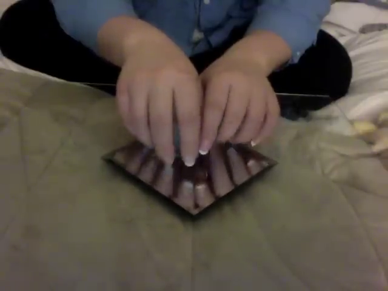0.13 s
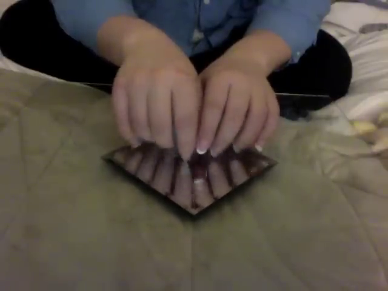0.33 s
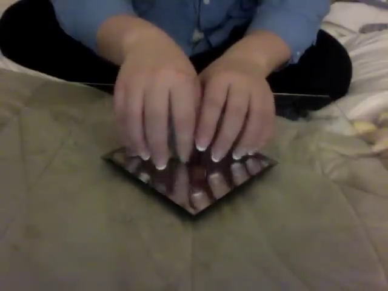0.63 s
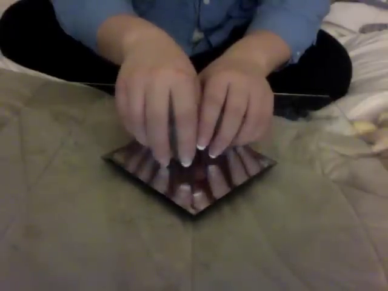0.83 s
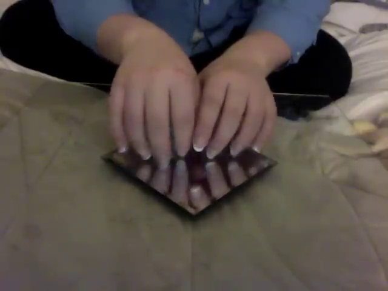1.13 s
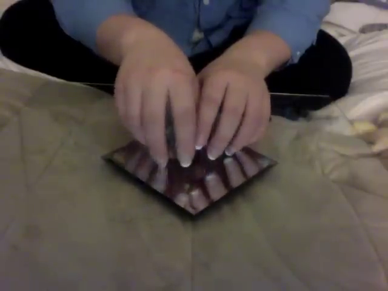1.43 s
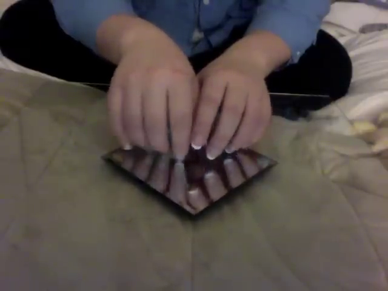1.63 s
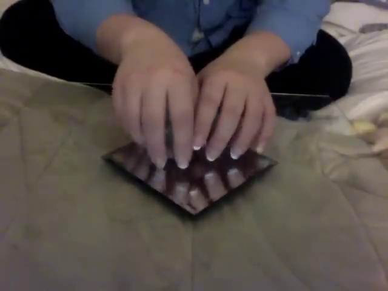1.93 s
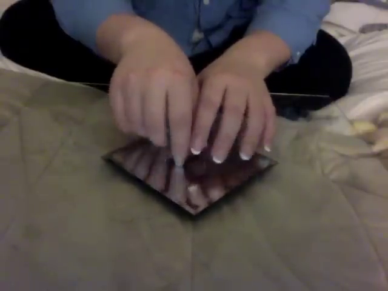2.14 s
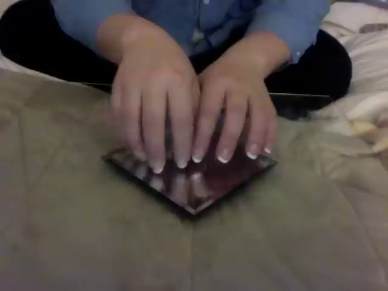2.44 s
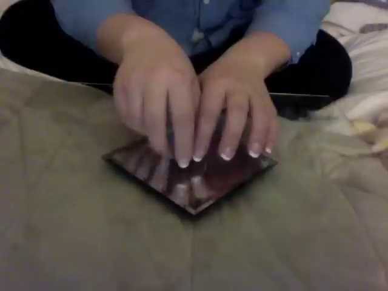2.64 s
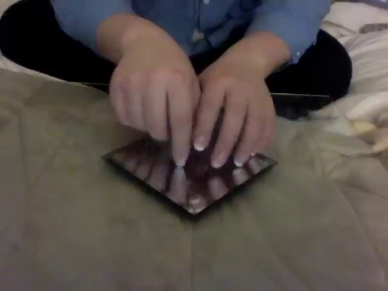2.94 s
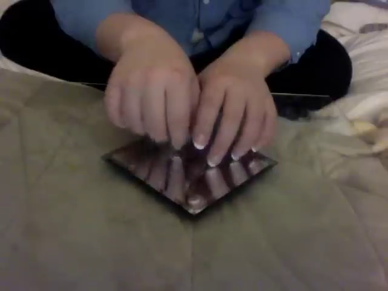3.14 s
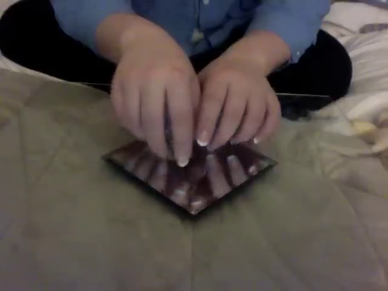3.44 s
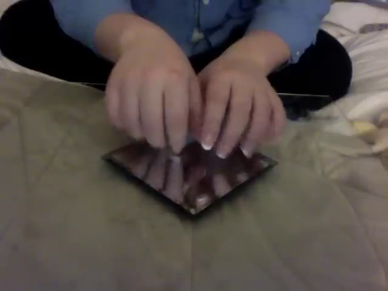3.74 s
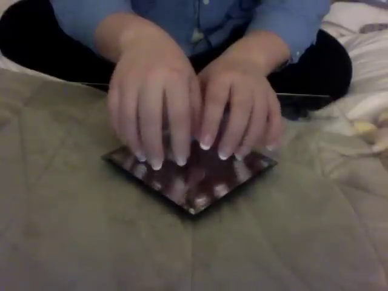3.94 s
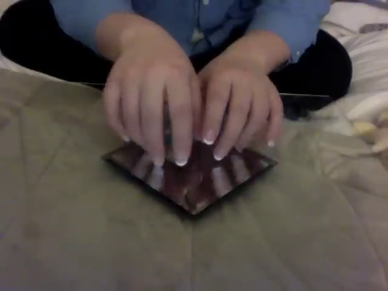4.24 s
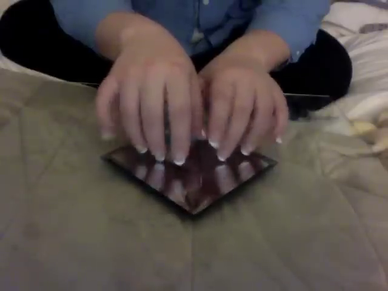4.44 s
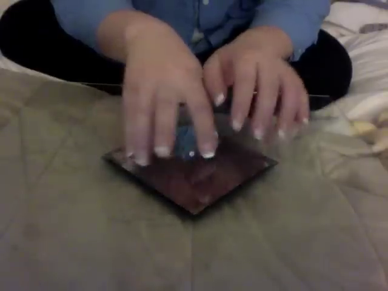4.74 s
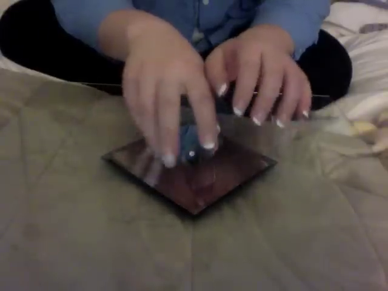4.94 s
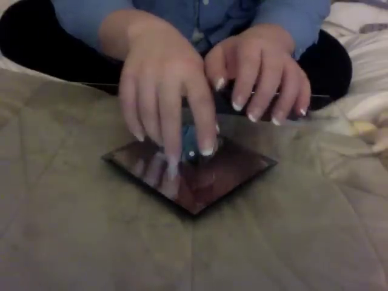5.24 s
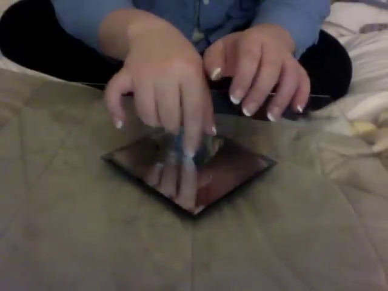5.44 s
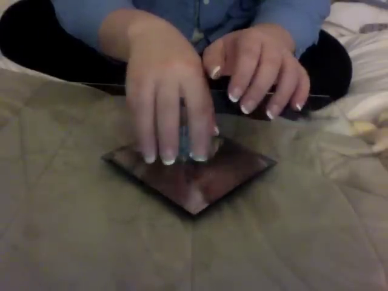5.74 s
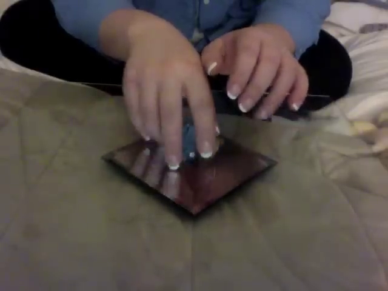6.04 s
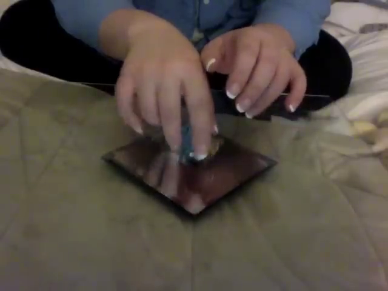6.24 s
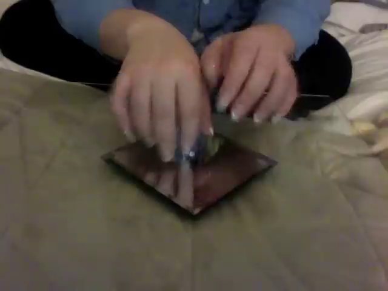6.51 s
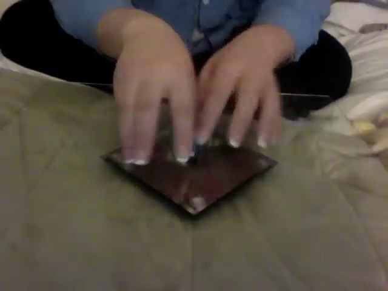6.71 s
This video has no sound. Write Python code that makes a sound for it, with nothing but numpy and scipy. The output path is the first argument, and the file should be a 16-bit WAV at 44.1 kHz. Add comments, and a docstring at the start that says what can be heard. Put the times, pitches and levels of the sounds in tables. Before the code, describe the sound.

Long fingernails tap a small glass mirror lying on soft bedding. Each touch gives a short dull thud with a tiny bright clink and snap. Taps come singly or in tight pairs, irregular in strength, thinning out toward the end with one last tap. A quiet fan hum, thin electronic whine and soft hiss continue throughout. Close microphone in a small, fairly dry room.

```python
"""Fingernails on a small mirror

Long fingernails tap a small glass mirror that lies on a soft bed cover in a quiet room.
Each tap is a low thud and a clink, both made of fading sine waves, plus a short snap of noise.
The touched spot picks which groups of glass tones ring. The room adds an echo and a short tail.
Behind it: wavering fan tones, a thin electronic whine, screen whistles, hiss, a narrow rushing
noise near 3 kHz and a faint tick every two seconds."""
import sys
import numpy as np
from scipy import signal
from scipy.fft import rfft, irfft, next_fast_len
from scipy.io import wavfile

SR = 44100
rng = np.random.default_rng(int(sys.argv[2]) if len(sys.argv) > 2 else 0)


def wrap_up_sound(samples):
    """Save the sound to the file named by the first command line argument, as 16-bit audio."""
    columns = np.atleast_2d(samples).T
    # keep every value between -1 and 1, then stretch to whole-number steps
    tamed = np.clip(columns, -1, 1)
    steps = np.round(tamed * 32767).astype(np.int16)
    wavfile.write(sys.argv[1], SR, steps)


N = 302967  # length of the scene in samples

# Nail taps. Levels are before the room; spot and brightness then alter the clink.
# Columns: start_s, thud_db, clink_db, brightness_db_per_octave, spot (0 middle, 0.5 side, 1 corner)
NAIL_TAPS = [(0.0307, -52, -57.5, -8, 0.24), (0.075, -53.5, -62, -15, 0), (0.5679, -47.5, -56, 0.5, 0.46),
             (0.617, -56, -65, -6, 0.26), (0.7712, -40.5, -54, -5, 0.065),
             (1.166, -51.5, -55.5, -0.5, 0.59), (1.223, -57, -62.5, 4, 0.23),
             (1.254, -52, -59.5, -12, 0.16), (1.4201, -46, -57, -12, 0), (1.615, -44, -66, -3, 0),
             (1.921, -49.5, -66, -8, .2), (2.0848, -35.5, -51.5, -1.5, 0.06), (2.315, -51, -63, -10, 0),
             (2.3881, -46.5, -55.5, 4.5, 0.26), (2.474, -39, -58.5, -6, 0.063),
             (2.8167, -45.5, -47, 0, 0.95), (2.8246, -39.5, -49, -5, 0.4), (2.851, -54, -75, 8, 0.027),
             (3.549, -37.5, -52, -2.5, 0.044), (3.822, -41, -50, 0.5, 0.61), (3.8818, -48, -62, -10, 0.59),
             (4.2033, -38, -50.5, -22, 0.38), (5.0363, -37.5, -47.5, 17, 0), (5.38, -54, -57, -16, 0.028),
             (5.76, -64, -58.5, 8, 0.25), (5.8482, -50.5, -52.5, -2.5, 0.23), (6.008, -48, -64, -10, 0.18),
             (6.814, -46.5, -51.5, -8, 0.61)]
# The mirror rocking on its soft backing; levels only relative to each other.
# Columns: pitch_hz, level_db, t60_s (time to fade by 60 dB)
ROCKING_MODES = [(149, -10.5, 0.056), (208, 4, 0.03), (236.7, 6.5, 0.046), (320, 1, 0.053),
                 (365, -6.5, 0.035), (450, -17, 0.018), (565, -31, 0.0091)]
# Tones of the glass plate, one list for each family that rings together; levels relative in a family.
# Columns: pitch_hz, level_db, t60_s
GLASS_FAMILIES = [
    [(1610, -7.5, 0.063), (1850, 1.5, 0.015), (2010, 1, 0.039), (2360, -10.5, 0.078), (3430, -26, 0.017)],
    [(3960, 2, 0.067), (4080, 2, 0.11), (4070, -5, 0.21), (4140, -8.5, 0.094)],
    [(4224, -7, 0.22), (4275, -9.5, 0.17), (4260, -7, 0.068), (4425, -4, .1), (4680, 5, .025)],
    [(4500, -10, 0.19), (5076, 7.5, 0.05), (5240, -3, 0.021), (5480, -5, 0.022)],
    [(6860, 5.5, 0.036), (6510, -9, 0.06), (7090, 9, 0.023)],
    [(7600, -2, .04), (7670, 5, 0.057), (10470, 0, 0.086), (12560, -9, .016), (13650, -15, .018)],
    [(7940, 2.5, 0.14), (9800, -7, .1)],
    [(8400, -5, 0.14), (8450, 13, 0.03), (8400, -18, 0.016)],
]
# How readily each of these families answers a tap, in the same order.
# Columns: middle_db, side_db, corner_db
FAMILY_SHAPES = [(0.5, -7.5, -9), (-1, -0.5, -7), (-1.5, -26, -8), (-30, 7.5, 6.5), (-1.5, -12, 4.5),
                 (-10, -15, -16), (-20, -2.5, -14), (-16.5, 1, -9)]
# Tone colour of the nail's own snap; levels only relative to each other.
# Columns: pitch_hz, level_db_per_hz
SNAP_COLOUR = [(700, -1), (1300, -20), (1800, -12), (3300, 7.5), (5800, 0.5), (8500, 2), (10000, -9),
               (14000, -6), (16000, -18)]
# Fan and motor tones.
# Columns: pitch_hz, rms_level_db, unsteadiness (0-1)
FAN_TONES = [(89.8, -59, 0.23), (133.2, -61.5, 0.26), (263.2, -64.5, 0.63), (398, -65.5, 0.41),
             (666.6, -66.5, 0), (3000, -76.5, 0.3), (3375, -79.5, 0.7), (3986, -75, 0.36)]
# Electronic whine.
# Columns: multiple (of WHINE_HZ), rms_level_db
WHINE_TONES = [(3, -79.5), (4, -79.5), (5, -67.5), (6, -73), (7, -79), (8, -75.5), (9, -70), (10, -77.5),
               (11, -80), (12, -70), (13, -74), (14, -78.5), (15, -77.5), (16, -80), (19, -79.5),
               (20, -75.5), (21, -74), (22, -77), (23, -78), (25, -87)]
# Screen line-scan whistles, which beat against each other.
# Columns: pitch_hz, rms_level_db, unsteadiness (0-1)
SCREEN_WHISTLES = [(15674, -80, .2), (15734.2, -66.5, .3), (15749, -72.5, .3)]
# Room air and microphone hiss, against full scale.
# Columns: pitch_hz, level_db_per_hz
HISS_COLOUR = [(25, -108), (50, -93.5), (75, -82.5), (110, -79.5), (190, -82), (320, -84.5), (500, -87),
               (800, -87), (1250, -95.5), (2200, -97.5), (4300, -99.8), (6500, -102), (9500, -103.7),
               (15000, -105.5)]
# The part of the hiss that differs between left and right, against the shared hiss.
# Columns: pitch_hz, side_level_db
HISS_WIDTH = [(25, -9), (70, -32), (250, -24), (1000, -25.5), (4000, -18.5), (8000, -11.5), (15000, -9)]
# Narrow band of rushing noise near 3 kHz, against full scale.
# Columns: pitch_hz, level_db_per_hz
RUSH_COLOUR = [(2000, -135), (2750, -106), (2900, -95), (3000, -92.5), (3120, -108), (4000, -135)]

TAP_LENGTH = SR // 4  # samples
THUD_SCATTER_DB = 1.5
# above this pitch a hard nail tip rings the glass more, a soft fingertip less
CONTACT_KNEE_HZ = 3910
# a harder contact also knocks higher:
# thud dB per octave for each dB per octave of brightness
THUD_FOLLOWS = 0.34
TICK_START_S, TICK_EVERY_S, TICK_DB = 0.126, 2.0, -52
ROOM_T60_S, ECHO_S, CLINK_ECHO_DB = 0.22, 0.027, -21
WHINE_HZ = 569.07
CUTOFF_HZ = 16000


def mirror():
    """Each tap rocks the mirror (thud), rings the glass (clink) and snaps; the snap grows with the ringing."""
    thuds, clinks = np.zeros(N), np.zeros(N)
    for start_s, thud_db, clink_db, brightness_db, spot in NAIL_TAPS:
        thud = ring(thud_modes(brightness_db), rise_s=0.0021, scatter_db=THUD_SCATTER_DB,
                    phase_spread=0.073)
        # the thud is flipped and comes a fraction of a millisecond after the clink
        add(thuds, -from_db(thud_db) * thud, start_s + 0.00038)

        strengths = from_db(clink_db) * family_gains(spot, brightness_db)
        glass = np.zeros(TAP_LENGTH)
        for strength, modes in zip(strengths, GLASS_FAMILIES):
            glass += strength * ring(modes, rise_s=0.0011, scatter_db=4.0, phase_spread=1.0)
        nail = strengths.mean() * from_db(-1.5) * snap(rise_s=0.00022, t60=0.022)
        add(clinks, glass + nail, start_s)
    # so small a plate radiates hardly any deep bass
    bass_cut = signal.butter(2, 75, "high", fs=SR, output="sos")
    return signal.sosfilt(bass_cut, thuds), clinks


def thud_modes(brightness_db):
    """A hard contact tilts the rocking tones towards the higher ones."""
    lowest_hz = ROCKING_MODES[0][0]
    tilt_db = THUD_FOLLOWS * brightness_db
    return [(hz, db + tilt_db * np.log2(hz / lowest_hz), t60) for hz, db, t60 in ROCKING_MODES]


def family_gains(spot, brightness_db):
    """The touched spot picks the families that ring; the hardness of the contact tilts the high ones."""
    shapes = [np.interp(spot, [0, 0.5, 1], from_db(shape_db)) for shape_db in FAMILY_SHAPES]
    # each family is judged by the pitch of its tone with the highest listed level
    leading_hz = np.array([max(modes, key=lambda mode: mode[1])[0] for modes in GLASS_FAMILIES])
    octaves_above_knee = np.maximum(np.log2(leading_hz / CONTACT_KNEE_HZ), 0)
    return shapes * from_db(brightness_db * octaves_above_knee)


def ring(modes, rise_s, scatter_db, phase_spread):
    """Fading tones that swell over the contact time; each blow weights them a little differently."""
    t = np.arange(TAP_LENGTH) / SR
    hz, db, t60 = np.transpose(modes)[:, :, None]
    strength = from_db(db + scatter_db * rng.standard_normal(hz.shape))
    phase = phase_spread * rng.uniform(-np.pi, np.pi, hz.shape)
    waves = strength * fade_out(t, t60) * np.sin(2 * np.pi * hz * t + phase)
    swell = 1 - np.exp(-(t / rise_s) ** 2)
    return unit_blow(waves.sum(axis=0) * swell)


def snap(rise_s, t60):
    """A few milliseconds of noise as the nail's edge meets the glass."""
    t = np.arange(TAP_LENGTH) / SR
    noise = coloured(rng.standard_normal(TAP_LENGTH), SNAP_COLOUR)
    swell = 1 - np.exp(-t / rise_s)
    return unit_blow(noise * swell * fade_out(t, t60))


def room(x, wet_db, echo_db, side_db, gap_s):
    """One wall echo and short diffuse reflections, almost alike at the two close microphone ports."""
    t = np.arange(TAP_LENGTH) / SR
    # the tail is silent until gap_s, then grows in over another gap_s
    fade = fade_out(t, ROOM_T60_S) * np.clip(t / gap_s - 1, 0, 1)
    tails = rng.standard_normal((2, TAP_LENGTH)) * fade / np.sqrt(np.sum(fade ** 2))
    mid, side = from_db(wet_db) * signal.fftconvolve(x[None], tails, axes=1)[:, :N]
    add(mid, from_db(echo_db) * x, ECHO_S)
    return x + mid + from_db(side_db) * side * [[1], [-1]]


def ticks(hz, t60):
    """A tiny high tick, a quickly fading sine wave, comes back every two seconds."""
    track = np.zeros(N)
    t = np.arange(TAP_LENGTH) / SR
    tick = from_db(TICK_DB) * np.sin(2 * np.pi * hz * t) * fade_out(t, t60)
    for start_s in np.arange(TICK_START_S, N / SR, TICK_EVERY_S):
        add(track, tick, start_s)
    return track


def background():
    """Hum, whistles, whine and rush sit in the middle; the hiss is slightly spread."""
    return fan_hum() + screen_whistle() + electronic_whine() + hiss_and_rush()


def fan_hum():
    """The fan and its motor give several tones, most of them wavering."""
    return sum(tone(hz, db, unsteady) for hz, db, unsteady in FAN_TONES)


def screen_whistle():
    """Very high line-scan tones so close in pitch that they beat."""
    return sum(tone(hz, db, unsteady) for hz, db, unsteady in SCREEN_WHISTLES)


def electronic_whine():
    """Thin tones at whole multiples of one base pitch."""
    return sum(tone(multiple * WHINE_HZ, db, unsteady=0.12) for multiple, db in WHINE_TONES)


def hiss_and_rush():
    """Shaped random noise: a wide hiss with a small left-right difference, and a narrow central rush."""
    white = rng.standard_normal((3, N)) * np.sqrt(SR / 2)  # power of 1 per Hz
    mid = coloured(white[0], HISS_COLOUR) + coloured(white[2], RUSH_COLOUR)
    side = coloured(coloured(white[1], HISS_COLOUR), HISS_WIDTH)
    return mid + side * [[1], [-1]]


def tone(hz, db, unsteady):
    """A sine wave whose level and phase waver by slow random drifts."""
    turn = 2 * np.pi * hz * np.arange(N) / SR
    waver = unsteady * (drift(2.76) * np.sin(turn) + drift(0.47) * np.cos(turn))
    steady = np.sin(turn + rng.uniform(0, 2 * np.pi))
    return from_db(db) * rms_one(steady + waver)


def drift(rate_hz):
    """Slow random wander with a spread of 1: noise smoothed twice, at a fortieth of the sample rate."""
    r = np.exp(-80 * np.pi * rate_hz / SR)
    noise = rng.standard_normal(N // 40 + 2002)
    slow = signal.lfilter([1], [1, -2 * r, r * r], noise)[2000:]  # drop the filter's start-up
    return np.interp(np.arange(N) / 40, np.arange(len(slow)), rms_one(slow))


def coloured(x, spectrum):
    """Shape noise by (pitch_hz, level_db) points joined on a log-frequency axis."""
    hz, db = np.transpose(spectrum)
    size = next_fast_len(len(x))
    bins_hz = np.maximum(np.fft.rfftfreq(size, 1 / SR), 1)
    gains = from_db(np.interp(np.log(bins_hz), np.log(hz), db))
    return irfft(rfft(x, size) * gains, size)[:len(x)]


def fade_out(t, t60):
    """Exponential decay that has fallen by 60 dB after t60 seconds."""
    return np.exp(-np.log(1000) * t / t60)


def from_db(db):
    """Decibels to gain."""
    return 10 ** (np.asarray(db) / 20)


def rms_one(x):
    """Scale to an rms (average strength) of 1."""
    return x / np.sqrt(np.mean(x ** 2) + 1e-20)


def unit_blow(x):
    """Scale a blow to an rms of 1 over its first 20 ms."""
    return x / np.sqrt(np.mean(x[:SR // 50] ** 2) + 1e-20)


def add(track, sound, start_s):
    """Mix a sound into a track at a time."""
    start = max(round(start_s * SR), 0)
    track[start:start + len(sound)] += sound[:N - start]


def scene():
    """The mirror close to the microphone, the room behind it, all very slightly louder on the right."""
    thuds, clinks = mirror()
    low = from_db(0.76) * room(thuds, wet_db=-14.5, echo_db=-14.5, side_db=-27.0, gap_s=0.0068)
    high = room(clinks + ticks(hz=5730.0, t60=0.027), wet_db=-10.5, echo_db=CLINK_ECHO_DB,
                side_db=-43.0, gap_s=0.0059)
    return low * from_db([[-0.25], [0.25]]) + (high + background()) * from_db([[-0.1], [0.1]])


def record(dry):
    """A steep filter cuts the top."""
    top_cut = signal.ellip(12, 0.1, 70, CUTOFF_HZ, fs=SR, output="sos")
    return signal.sosfilt(top_cut, dry)


dry = scene()
out = record(dry)
wrap_up_sound(out)
```